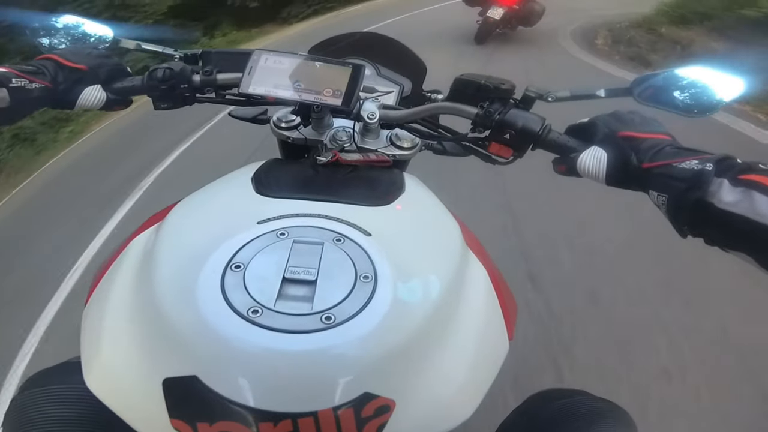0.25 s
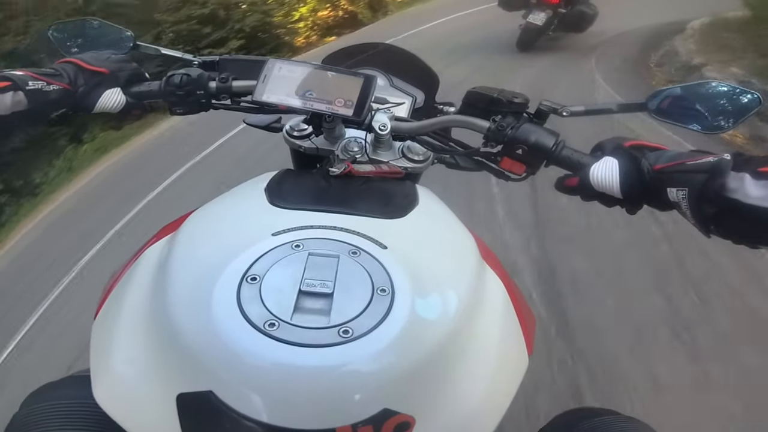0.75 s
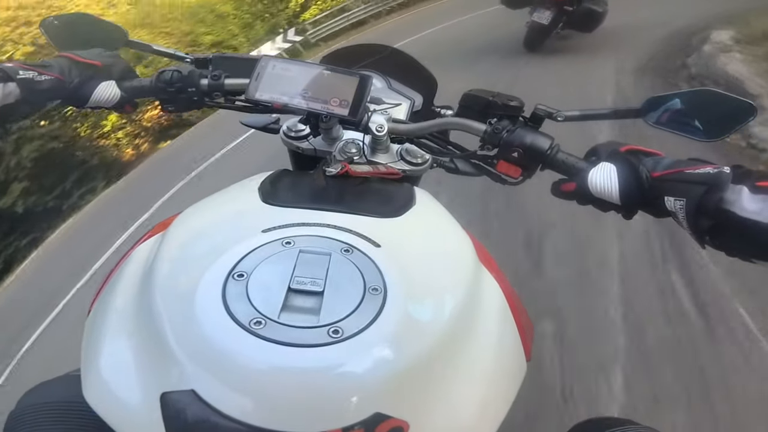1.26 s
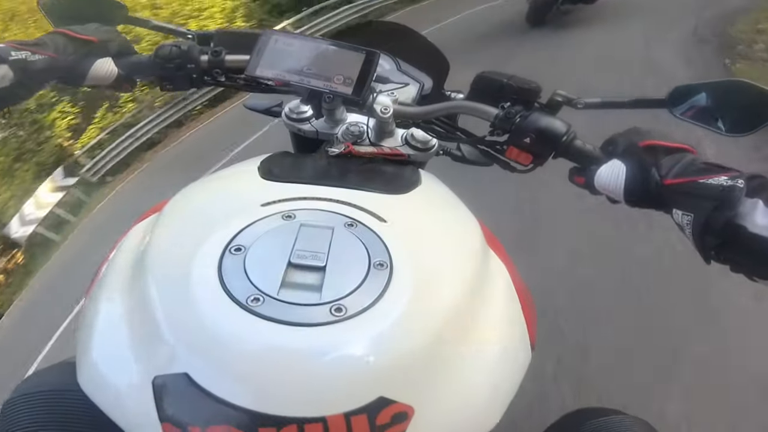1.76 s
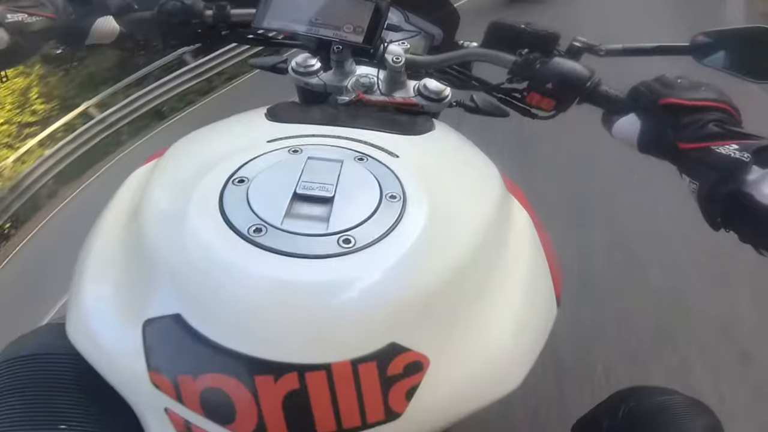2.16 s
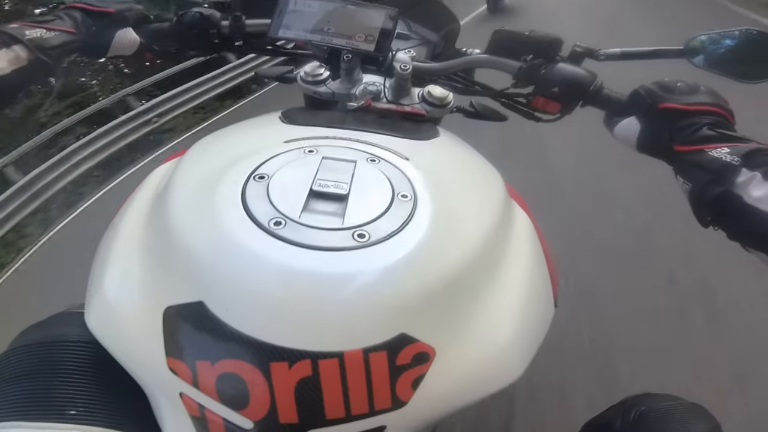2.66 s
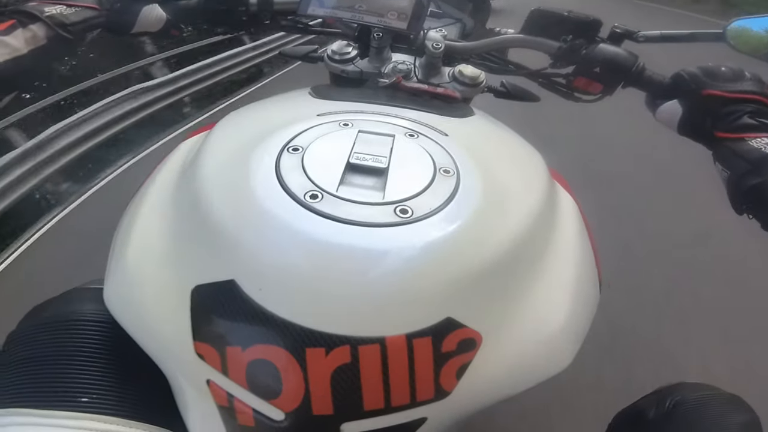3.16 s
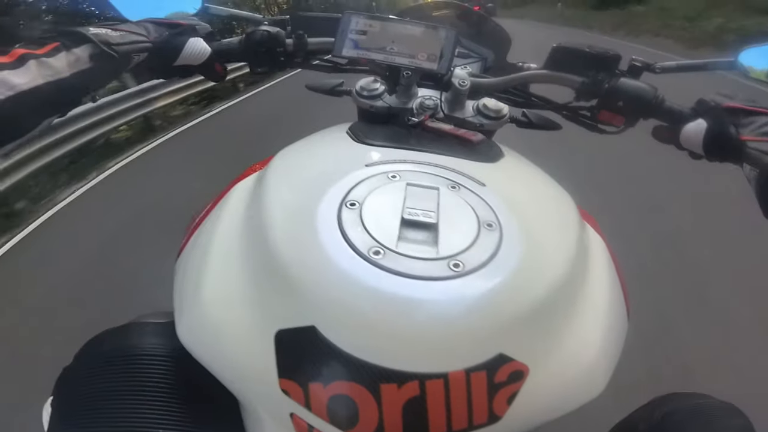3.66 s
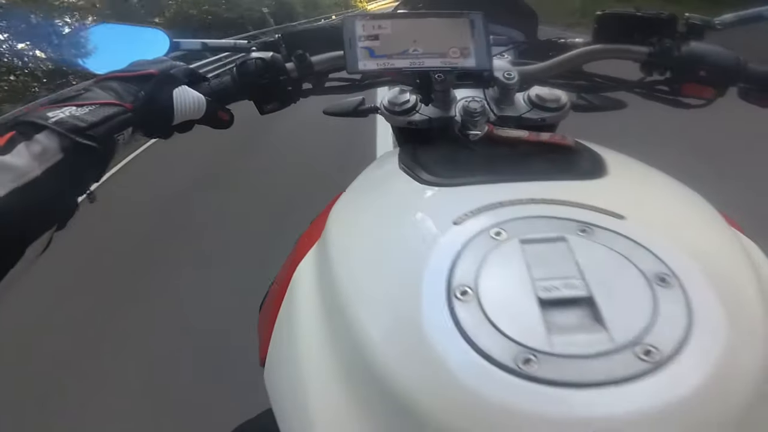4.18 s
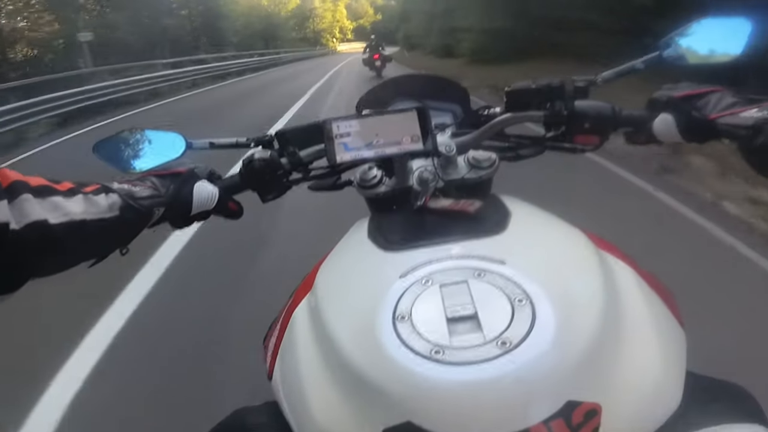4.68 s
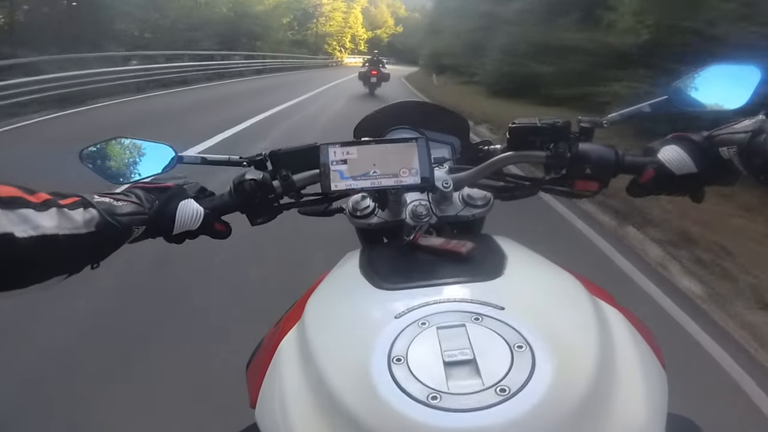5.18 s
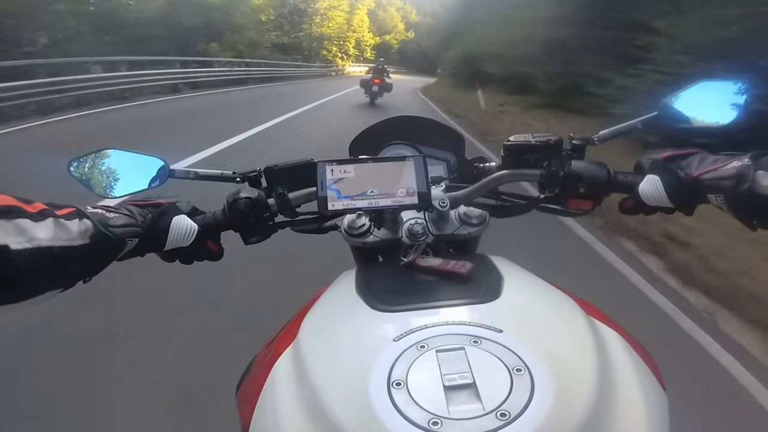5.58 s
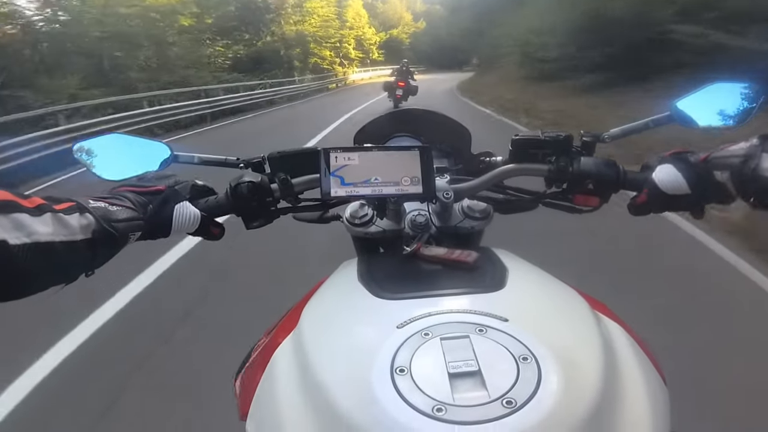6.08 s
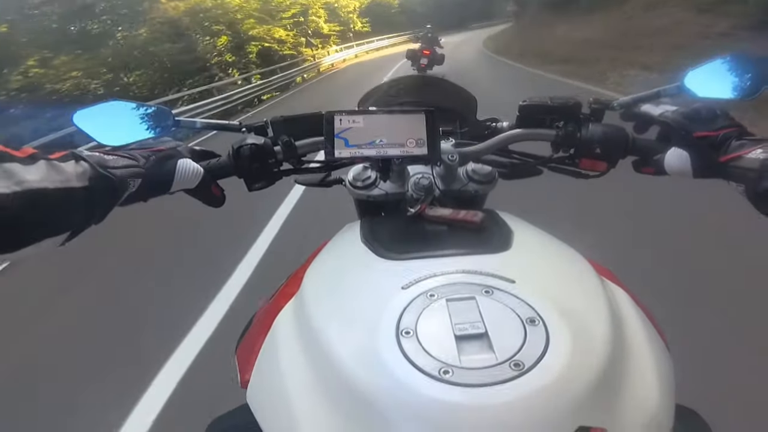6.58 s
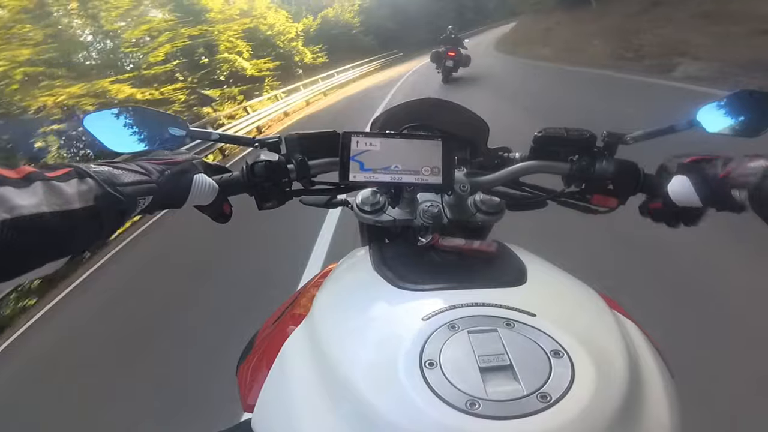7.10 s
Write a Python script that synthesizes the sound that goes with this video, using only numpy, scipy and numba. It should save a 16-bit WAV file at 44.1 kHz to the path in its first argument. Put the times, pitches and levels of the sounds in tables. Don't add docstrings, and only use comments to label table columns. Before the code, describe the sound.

Mountain road, microphone worn by the rider. Ragged low engine throb and irregular muffled bangs from a bike in front come first; that bike opens up slightly earlier, then the rider's own engine swells into a loud, distorted, rising growl. A sudden throttle release stutters and drops the volume. A steady cruising drone follows with valve clatter, faint gear whine, light wind buffeting and hiss, ending on crackles and renewed bark ahead.

```python
import sys
import numpy as np
from scipy import signal
from scipy.fft import rfft, irfft
from scipy.io import wavfile
from scipy.ndimage import uniform_filter1d
from numba import njit

SR = 44100
rng = np.random.default_rng(int(sys.argv[2]) if len(sys.argv) > 2 else 0)


def generate_wav(sig):
    pcm = np.round(np.clip(np.atleast_2d(sig).T, -1, 1) * 32767).astype(np.int16)
    wavfile.write(sys.argv[1], SR, pcm)


def voltage_ratio(level):
    return 10 ** (np.asarray(level, float) / 20)


N = 323694

# (time [s], speed [cycles/s])
OWN_REVS = [(0, 23.6), (.22, 21.9), (.42, 20.47), (1.9, 19.85), (2, 19.9), (2.39, 22.9), (2.7, 26.3),
            (3.04, 30.5), (3.58, 35.6), (3.98, 38.8), (4.62, 45.7), (4.99, 48.3), (5.15, 45.7),
            (5.25, 47.7), (5.52, 47.05), (6.29, 45.3), (6.79, 44.6), (7.34, 44.3)]
# (time [s], throttle [0-1])
THROTTLE = [(0, 0.24), (.5, 0.18), (2.05, 0.35), (2.28, 0.83), (2.6, 0.82), (3.5, 0.94), (3.8, 0.91),
            (4.4, 0.99), (4.98, 0.78), (5.03, 0.2), (5.2, 0.1), (5.27, 0), (5.35, 0.08), (6.5, 0.07),
            (6.8, 0.03), (7.1, 0), (7.34, 0.15)]
# (start [s], end [s], scatter [dB], sag [dB])
STUMBLES = [
    (0.502, 1.907, 3.5, -5.5),
    (1.906, 2.15, 1.16, -0.5),
    (5.039, 5.328, 4.5, -9.5),
]
# (multiple of the cycle, level [dB])
COAST_PARTIALS = [(1, -39), (2, -36), (3, -17), (4, -19), (5, -8), (6, -11), (7, -7), (8, -7), (9, -4),
                  (10, -7), (11, 0), (12, -3), (13, -8), (14, -8), (15, -17), (16, -8), (17, -15),
                  (18, -17), (19, -19)]
# (multiple of the cycle, level [dB])
CRUISE_PARTIALS = [(1, -38), (2, -46), (3, -11.5), (4, -2), (5, 0.5), (6, -2), (7, -16.5), (8, -11),
                   (9, -14), (10, -19), (11, -34), (12, -21), (13, -33), (14, -38), (15, -54), (16, -32),
                   (17, -18.5), (18, -33), (19, -32)]
# (multiple of the cycle, level [dB])
PULL_PARTIALS = [(1, -30), (2, -24), (3, -26), (4, 5), (5, 6.5), (6, 5), (7, -9), (8, 2.5), (9, 0.5),
                 (10, -3), (11, -1), (12, -2), (13, -1), (14, 2), (15, -11), (16, -11), (17, 3), (18, -9),
                 (19, -11.5), (20, -12), (21, -10), (22, -12), (23, -9), (24, -11), (25, -9)]
# (frequency [Hz], level [dB])
HONK_COLOUR = [(120, -25), (200, -1), (250, 4), (295, 6.5), (370, 0), (450, -3.5), (580, -6), (900, -14)]
# (speed [cycles/s], level [dB])
PIPE_SHUT = [(20, -21.5), (22, -21), (46, -9)]
PIPE_OPEN = [(20, -24), (26, -26), (30, -30), (35, -28), (40, -26), (48, -26)]
# (frequency [Hz], width [Hz], level [dB])
EXHAUST_MODES = [(124, 46, -9), (193.2, 64, 1), (238, 77, -1), (281.9, 30, -2.5), (720, 730, -32),
                 (356, 62, -8)]
AIRBOX_MODES = [(199, 31, -8.5), (264.6, 55, 3.5), (343, 200, -6.5), (571, 120, -12), (750, 340, -18),
                (1230, 405, -23)]
CASING_MODES = [(810, 66, 13.5), (1517, 108, 4.5), (1860, 270, 4.5), (2430, 350, 2), (3296, 230, -0.5),
                (4110, 200, -12), (4880, 150, -18), (6350, 550, -42)]
# (multiple of the cycle, level [dB])
GEAR_WHINE = [(40, -44.5), (44, -47), (50, -42), (55, -48)]
# (start [s], end [s], multiple of the cycle, level
# [dB])
FLUTTER = [(5.03, 5.09, 5, -16), (5.09, 5.14, 6, -13), (5.145, 5.235, 5, -5), (5.23, 5.31, 4, -11),
           (5.26, 5.31, 6, -14), (5.3, 5.34, 5, -4)]
# (time [s], speed [cycles/s])
AHEAD_REVS = [(0, 22), (1.2, 22), (1.55, 24), (1.83, 26.5), (2.3, 32.5), (2.75, 36.8), (3.06, 40.7),
              (3.98, 50.8), (5.3, 53.38), (6.7, 51.8), (7.1, 52.3), (7.34, 55.5)]
# (time [s], level [dB])
AHEAD_LEVEL = [(0, -43), (.9, -45), (1.6, -40), (2.1, -23), (2.4, -24.5), (3.67, -17), (4.15, -25),
               (5.1, -27), (6.83, -32), (6.852, -21.5), (6.93, -22), (7, -22), (7.09, -18), (7.15, -19.5),
               (7.21, -17), (7.27, -15.5), (7.34, -15)]
# (frequency [Hz], width [Hz], level [dB])
AHEAD_PIPE_MODES = [(287, 91, 2), (454, 125, 1.5), (580, 232, -2), (840, 490, -13), (2010, 100, -24.5)]
# (delay [s], gain)
BOUNCES = [
    (.0035, .25),
    (.0082, .12),
]
# (time [s], peak [dB], ring [Hz])
POPS = [(0.513, -2, 266), (0.578, -8, 290), (0.781, 0, 304), (0.874, -9, 282), (0.979, -2, 303),
        (1.091, -11, 280), (1.177, -1, 306), (1.316, -10, 333), (1.508, -1.5, 255), (1.613, -15, 276),
        (1.7, -8, 343), (1.821, -7.5, 290), (1.858, -9, 342), (1.959, -6, 284), (2.061, -0.5, 288.3),
        (3.844, -7, 620), (3.885, -5.5, 633), (3.925, -11.5, 612), (6.849, -6, 616), (6.872, -14, 590),
        (6.89, -10, 590), (6.905, -13, 523), (7.003, -10.5, 590), (7.039, -10, 605), (7.136, -5, 580),
        (7.154, -7, 680)]
# (time [s], size [0-1])
TICKS = [(4.3345, .08), (4.3398, .3), (4.3451, .62), (4.3493, .06), (4.3505, .15), (4.3558, .45),
         (4.3611, .15)]
# (frequency [Hz], density [dB/Hz])
PORT_SPECTRUM = [(350, -19.5), (600, -17.5), (756, -6.5), (1150, -4.5), (1560, -1), (2990, -4.5),
                 (3330, 0.5), (6850, -16.5), (8520, -14.5), (9760, -20), (15500, -19.5)]
# (frequency [Hz], density [dB/Hz])
TOP_SPECTRUM = [(4000, 7.5), (6500, 5.5), (7500, -4), (9600, -0.5), (10500, 4.5), (11400, -1), (13500, 1.5),
                (14000, -3), (15400, 2), (16000, -49)]

# (at walking revs [dB], per octave of revs [dB], at full throttle [dB],
# per dB of the bike ahead [dB])
BUFFET = (-52, 7.5, 1, 0.12)
PORT_HISS = (-49, 2, 2, 0.2634)
TOP_HISS = (-57.5, -2.5, 1.5, 0.5058)
GULP_AT, GULP_GAP, GULP_TWIN = .37, .36, .9
CEILING = 0.37


def level(x):
    return x / np.sqrt(np.mean(x ** 2))


def curves(table):
    s, *columns = np.transpose(table)
    return [np.interp(np.arange(N) / SR, s, c) for c in columns]


def smooth_twice(x, size):
    return uniform_filter1d(uniform_filter1d(x, size), size)


@njit
def svf(x, hz, width):
    y, b, l = np.empty(len(x)), 0., 0.
    g, k = np.tan(np.pi * hz / SR), width / hz
    for i in range(len(x)):
        v = (b + g * (x[i] - l)) / (1 + g * (g + k))
        b, l, y[i] = 2 * v - b, l + 2 * g * v, k * v
    return y


def ring(x, modes):
    y = 0
    for k, (hz, width, db) in enumerate(modes):
        y = y + (-1) ** k * voltage_ratio(db) * svf(x, 1. * hz, 1. * width)
    return signal.sosfilt(signal.butter(2, 2.5 * max(modes)[0], fs=SR, output="sos"), y)


def noise():
    return rng.standard_normal(N)


def walk(rate):
    hold = int(SR / rate)
    held = np.repeat(rng.standard_normal(N // hold + 1), hold)
    return 1.26 * smooth_twice(held, hold)[:N]


def coloured(points):
    hz, db = np.transpose(points)
    f = np.arange(1, N // 2 + 2) * SR / N
    return level(irfft(rfft(noise()) * voltage_ratio(np.interp(np.log(f), np.log(hz), db)), N))


def strokes(turns, lag, rough_db, slip_s):
    cycle = np.arange(1, turns[-1] - lag) + lag
    chance = rng.standard_normal((400, 2))[:len(cycle)]
    at = np.interp(cycle, turns, np.arange(N))
    rough = rough_db[at.astype(int)]
    at = np.clip(at + slip_s * SR * rough * chance[:, 0], 0, N - 2)
    size, whole = voltage_ratio(rough * chance[:, 1]), at.astype(int)
    out = np.zeros(N)
    np.add.at(out, whole, size * (1 - at + whole))
    np.add.at(out, whole + 1, size * (at - whole))
    return out


def steady(x, hz):
    return level(x / np.sqrt(hz))


def puffs(pulses, decay_s):
    return signal.lfilter([1], [1, -np.exp(-1 / (decay_s * SR))], pulses)


def controls():
    (hz,), (load,), t = curves(OWN_REVS), curves(THROTTLE), np.arange(N) / SR
    rough_db, sag_db = np.full(N, .8), np.zeros(N)
    for start, end, scatter_db, drop_db in STUMBLES:
        during = (t >= start) & (t < end)
        rough_db[during], sag_db[during] = scatter_db, drop_db
    fade = int(.06 * SR)
    rough_db, sag_db = uniform_filter1d(rough_db, fade), uniform_filter1d(sag_db, fade)
    return hz, np.log2(hz / 20), np.clip(load, 0, 1), rough_db, sag_db


def engine():
    hz, octaves, load, rough_db, sag_db = controls()
    turns = np.cumsum(hz) / SR
    fast = np.clip((hz - 24) / 10, 0, 1)
    fired = strokes(turns, 0, rough_db, 0.00017) + 0.32 * strokes(turns, 0.49, rough_db, 0.00023)
    sucked = strokes(turns, .3, rough_db, 0.0001)
    sucked = sucked + .8 * strokes(turns, .3 + GULP_GAP, rough_db, .00012)
    gas = (0.82 + puffs(fired, 0.0059)) * noise()
    parts = exhaust(turns, hz, load, rough_db, sag_db, fast, fired, gas)
    parts = parts + airbox(turns, hz, load, rough_db, sucked, gas)
    parts = parts + flutter(turns) + valve_gear(octaves, load, fired + sucked)
    return parts + gear_whine(turns, hz) + cam_chain(turns, fast)


def exhaust(turns, hz, load, rough_db, sag_db, fast, fired, gas):
    shut_db = np.interp(hz, *np.transpose(PIPE_SHUT))
    open_db = np.interp(hz, *np.transpose(PIPE_OPEN))
    pipe_db = shut_db + load * (open_db - shut_db) + sag_db
    coast = level(drone(turns, COAST_PARTIALS, rough_db, smear(.13)))
    cruise = level(drone(turns + .3, CRUISE_PARTIALS, rough_db, smear(.17)))
    hum = (1 - fast) * coast + fast * cruise
    stumble = voltage_ratio(4.3 * rough_db - 18)
    bangs = 0.54 * steady(ring(fired, EXHAUST_MODES), hz) + 1.19 * level(ring(gas, EXHAUST_MODES))
    return voltage_ratio(pipe_db) * (hum + stumble * bangs)


def airbox(turns, hz, load, rough_db, sucked, gas):
    shut_db, open_db = -33, -5
    colour_hz, colour_db = np.transpose(HONK_COLOUR)

    def colour(k):
        return np.interp(np.log(k * hz[::64]), np.log(colour_hz), colour_db)

    honk = level(drone(turns, PULL_PARTIALS, rough_db, gulps, colour))
    body = thin(steady(ring(sucked, AIRBOX_MODES), hz))
    rush = level(ring(gas, AIRBOX_MODES))
    slap = steady(ring(strokes(turns, .57, rough_db, .0001), AIRBOX_MODES[3:]), hz)
    slap = voltage_ratio(-19) * np.clip(26 / hz, 0, 1) ** 3 * slap
    box = honk + voltage_ratio(-18.0) * body + voltage_ratio(-11.0) * rush + slap
    return voltage_ratio(shut_db + load * (open_db - shut_db)) * box


def drone(turns, orders, rough_db, lead, colour=lambda k: 0):
    out, coarse = 0, np.arange(0, N, 64)
    slip_cycles = .003
    for k, db in orders:
        size = 12.8 * smooth_twice(rng.standard_normal(len(coarse)), 40)
        slip = 12.8 * smooth_twice(rng.standard_normal(len(coarse)), 40)
        waver = voltage_ratio(db + colour(k) + (.4 + .45 * rough_db[coarse]) * size)
        drift = slip_cycles * k ** 2 / 6 * rough_db[coarse] * slip
        phase = k * turns + lead(k) + np.interp(np.arange(N), coarse, drift)
        out = out + np.interp(np.arange(N), coarse, waver) * np.sin(2 * np.pi * phase)
    return out


def smear(spread):
    return lambda k: spread * k ** 2


def gulps(k):
    pair = 1 + GULP_TWIN * np.exp(-2j * np.pi * k * GULP_GAP)
    return np.angle(pair) / (2 * np.pi) - k * GULP_AT


def thin(x):
    return signal.sosfilt(signal.butter(3, 190, "high", fs=SR, output="sos"), x)


def flutter(turns):
    t, fade = np.arange(N) / SR, int(.02 * SR)
    out = 0
    for start, end, k, db in FLUTTER:
        gate = uniform_filter1d(1. * ((t >= start) & (t < end)), fade)
        out = out + voltage_ratio(db) * gate * np.sin(2 * np.pi * k * turns)
    return out


def valve_gear(octaves, load, knocks):
    clatter_db = -41.5 + 7 * octaves + 2.5 * load
    valves = (3.6 + puffs(knocks, 0.006)) * noise()
    return voltage_ratio(clatter_db + 1.0 * walk(19)) * level(ring(valves, CASING_MODES))


def gear_whine(turns, hz):
    whine = 0
    for m, db in GEAR_WHINE:
        drift = 25 * np.cumsum(walk(30)) / SR
        whine = whine + voltage_ratio(db + 2 * walk(9)) * np.sin(2 * np.pi * m * turns + drift)
    return np.clip(hz / 45, 0, 1) ** 3 * whine


def cam_chain(turns, fast):
    return (1 - fast) * voltage_ratio(-53 + 3.9 * walk(6.9)) * np.sin(2 * np.pi * 80 * turns)


def ahead():
    (hz,), (db,) = curves(AHEAD_REVS), curves(AHEAD_LEVEL)
    turns, rough_db = np.cumsum(hz) / SR + .8, np.full(N, 1.6)
    fired = strokes(turns, 0, rough_db, 0.00015) + 0.17 * strokes(turns, .38, rough_db, 0.0003)
    jet = puffs(fired, .008) * noise()
    rasp = voltage_ratio(-5) * steady(ring(jet, AHEAD_PIPE_MODES), hz)
    bark = steady(ring(fired, AHEAD_PIPE_MODES), hz) + rasp
    bark = level(bark + sum(gain * np.roll(bark, int(s * SR)) for s, gain in BOUNCES))
    puff = voltage_ratio(db - 13 * np.log2(hz / 28)) * steady(puffs(puffs(fired, .005), .005), hz)
    rattle = level(ring(noise(), CASING_MODES[2:]))
    spit = puff * (voltage_ratio(-23) * coloured(TOP_SPECTRUM) + voltage_ratio(-11.5) * rattle)
    side_spit = puff * voltage_ratio(-23) * coloured(PORT_SPECTRUM)
    return voltage_ratio(db) * bark, spit, side_spit


def pops():
    out, t = np.zeros(N), np.arange(int(.03 * SR)) / SR
    swell = (t / 0.0041) ** 2.24 * np.exp(-(t / 0.0041) ** 2)
    snap = np.exp(-((t - .0044) / 0.001) ** 2) * np.sin(2 * np.pi * 890 * t)
    for s, db, hz in POPS:
        bang = voltage_ratio(db + 6.0) * swell * np.sin(2 * np.pi * hz * t)
        crack = voltage_ratio(2 * db - 14.5) * snap
        i = int(s * SR)
        out[i:i + len(t)] -= bang + crack
    return out + 0.16 * np.roll(out, int(0.01137 * SR)) + 0.32 * np.roll(out, int(0.027 * SR))


def ticks(wave):
    out, t = np.zeros(N), np.arange(-20, 21) / SR
    knock = np.exp(-(t / .00015) ** 4) * (.75 + .5 * np.cos(2 * np.pi * 11200 * t))
    knock = knock + 0.36 * np.exp(-(t / 0.00027) ** 2) * np.cos(2 * np.pi * 3100 * t)
    for s, size in TICKS:
        i = int(s * SR)
        out[i:i + len(t)] += size * knock * np.sign(wave[i])
    return np.roll(out, -20)


def air(rule):
    _, octaves, load, *_ = controls()
    (ahead_db,) = curves(AHEAD_LEVEL)
    ahead_db = uniform_filter1d(ahead_db, SR // 4)
    base_db, octave_db, load_db, ahead_share = rule
    return base_db + octave_db * octaves + load_db * load + ahead_share * (ahead_db - ahead_db[0])


def wind_buffet():
    thump = svf(svf(noise(), 44.0, 60.0), 44.0, 60.0)
    return voltage_ratio(air(BUFFET) + 2.0 * walk(8.7)) * level(thump)


def top_hiss():
    return voltage_ratio(air(TOP_HISS) + 1.3 * walk(18)) * coloured(TOP_SPECTRUM)


def port_hiss():
    return voltage_ratio(air(PORT_HISS) + 1.9 * walk(16)) * coloured(PORT_SPECTRUM)


def scene():
    low_cut = signal.butter(4, 58, "high", fs=SR, output="sos")
    bark, spit, side_spit = ahead()
    loud = signal.sosfilt(low_cut, engine() + bark + pops()) + wind_buffet()
    middle = np.clip(loud, -CEILING, CEILING) + top_hiss() + spit
    middle = middle - ticks(uniform_filter1d(middle, 25))
    middle = np.clip(middle, -1.15 * CEILING, 1.15 * CEILING)
    side = port_hiss() + side_spit
    return np.array([middle + side, middle - side])


def roll_off(x):
    return signal.sosfilt(signal.butter(12, 15380, fs=SR, output="sos"), x)


def record(dry):
    top_cut = signal.ellip(8, .2, 70, 15350, fs=SR, output="sos")
    mix = signal.sosfiltfilt(top_cut, dry)
    return roll_off(mix)


dry = scene()
out = record(dry)
generate_wav(out)
```